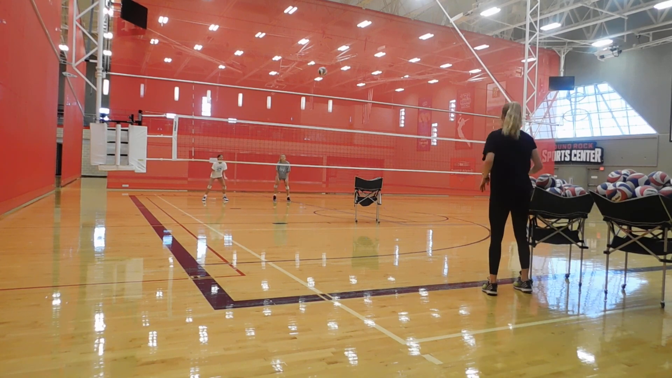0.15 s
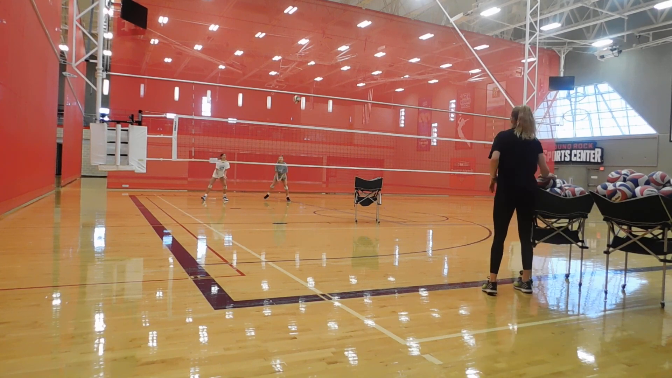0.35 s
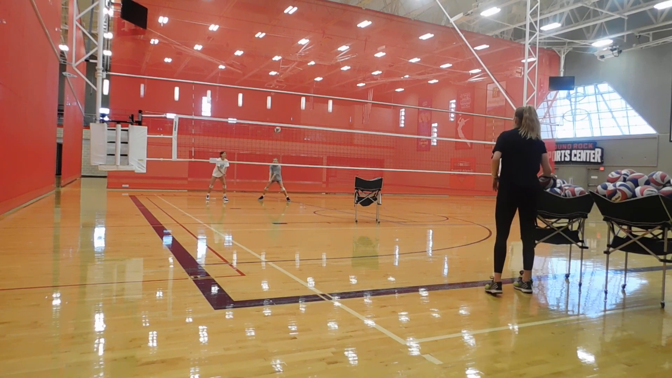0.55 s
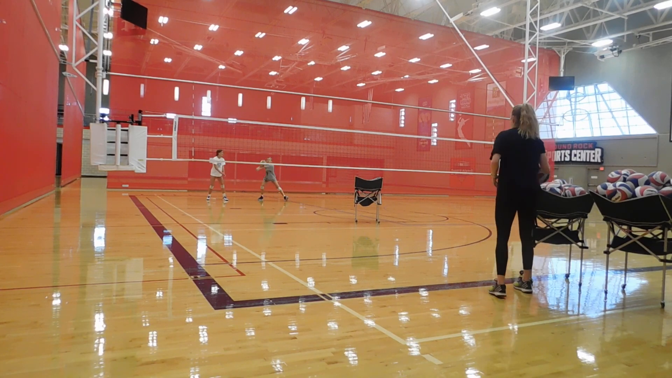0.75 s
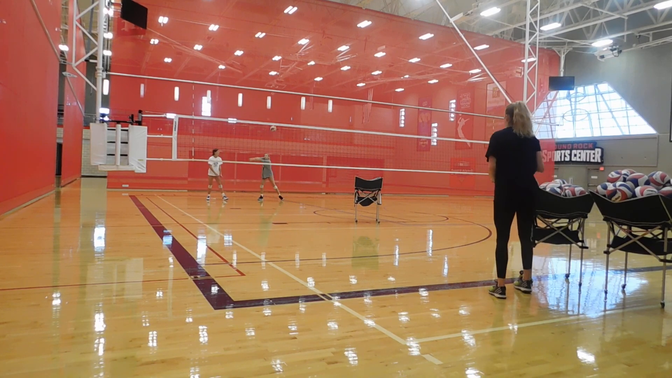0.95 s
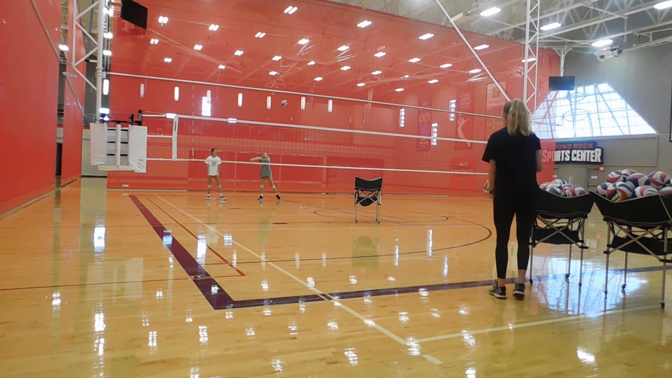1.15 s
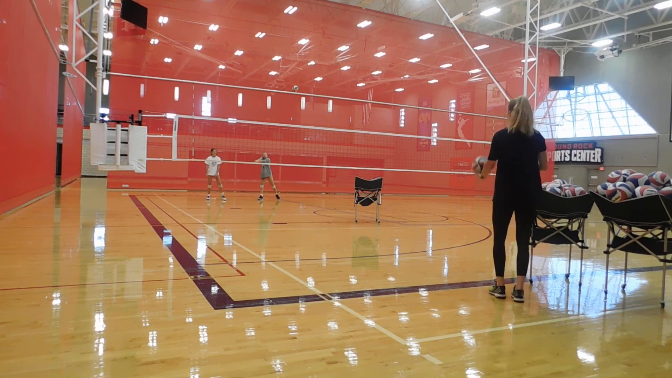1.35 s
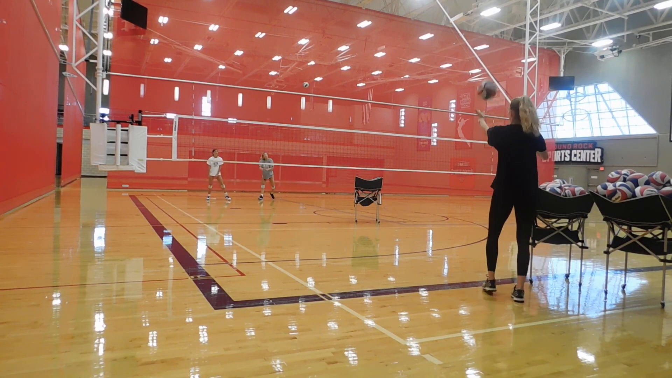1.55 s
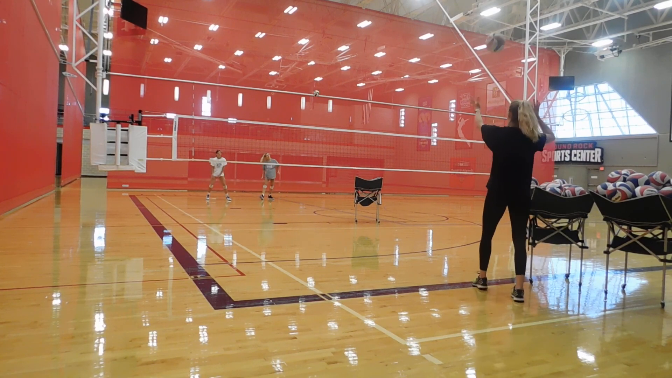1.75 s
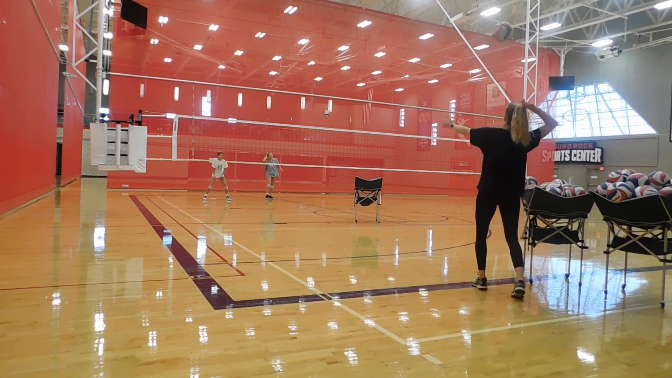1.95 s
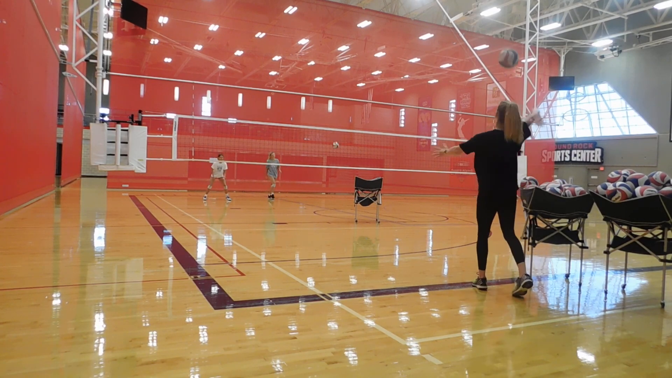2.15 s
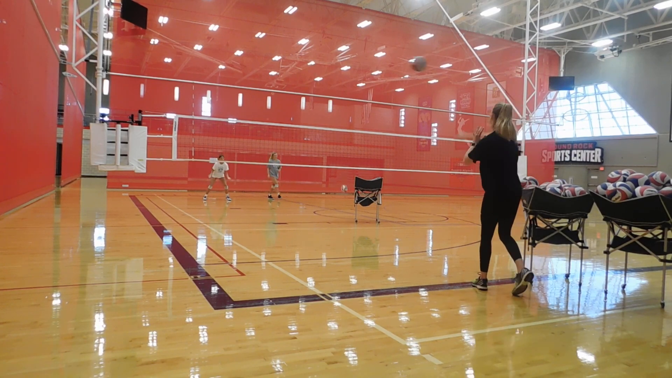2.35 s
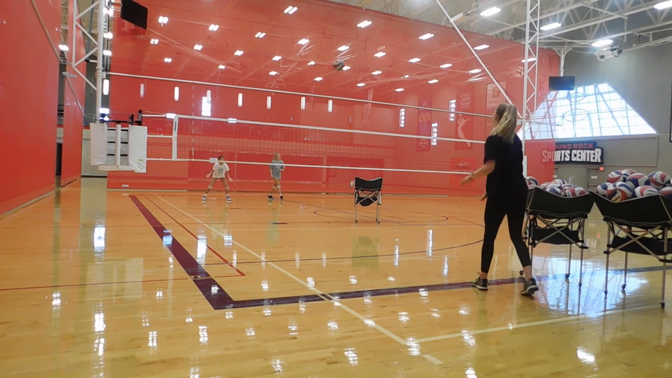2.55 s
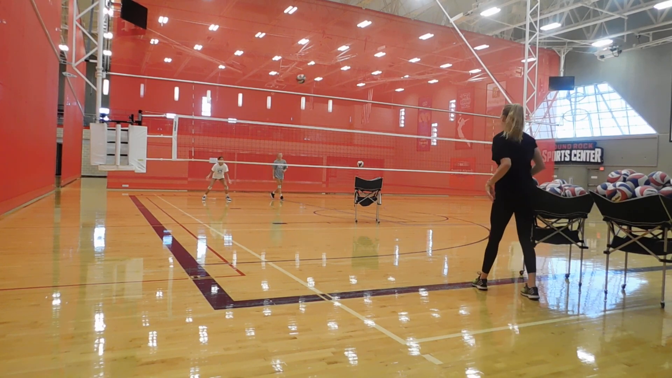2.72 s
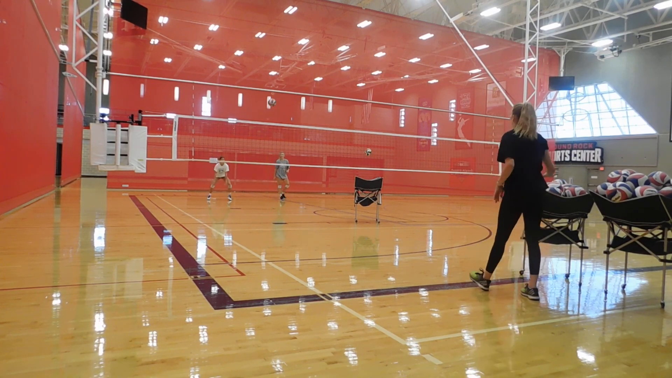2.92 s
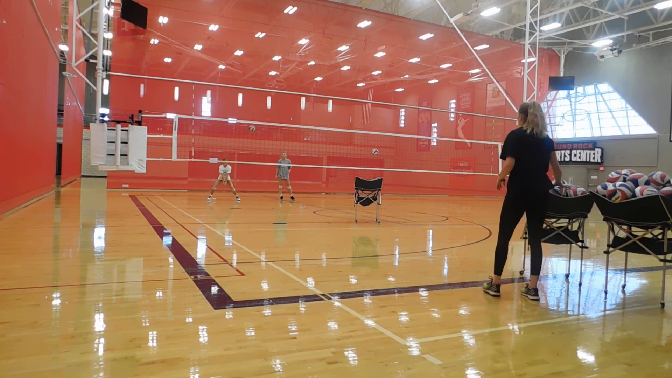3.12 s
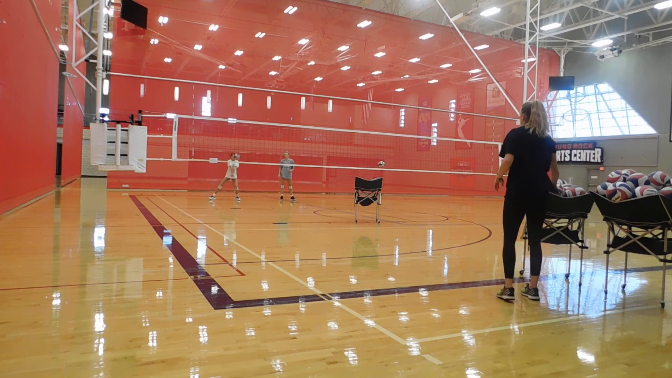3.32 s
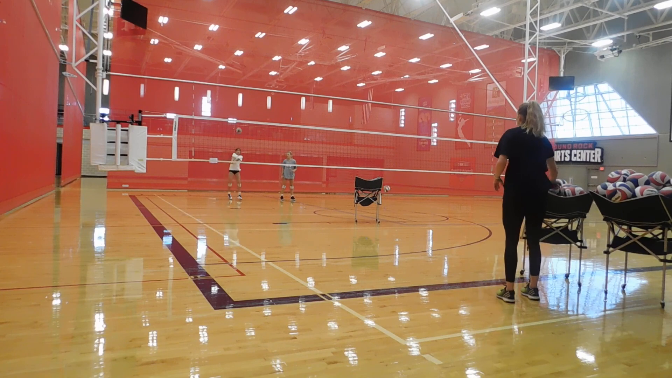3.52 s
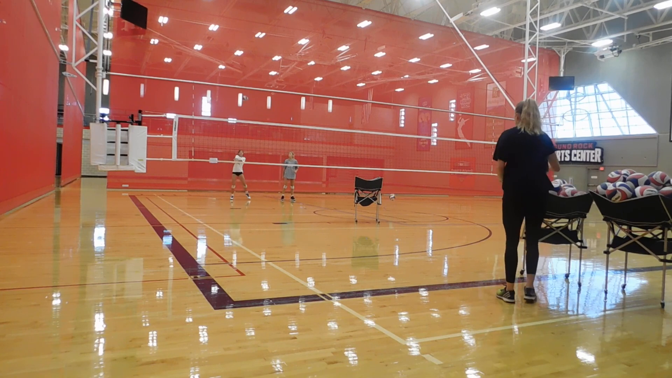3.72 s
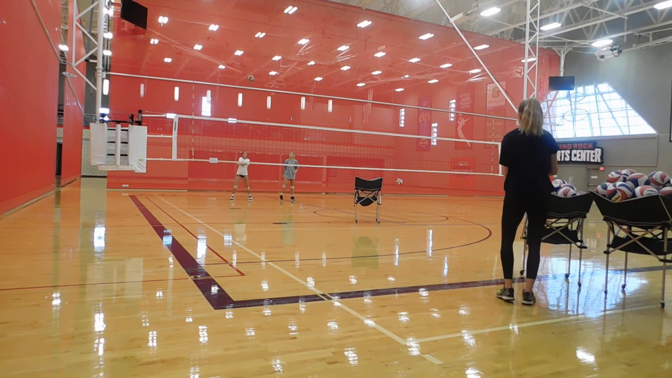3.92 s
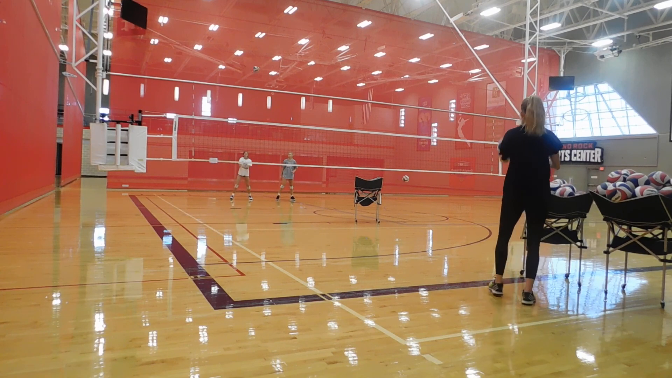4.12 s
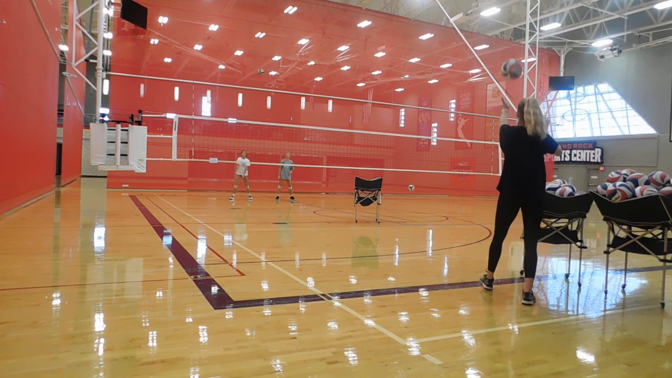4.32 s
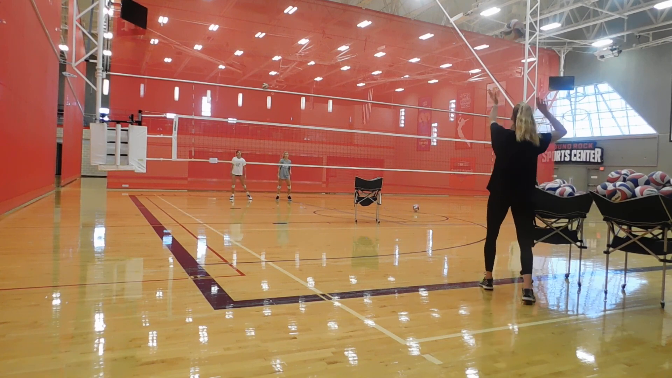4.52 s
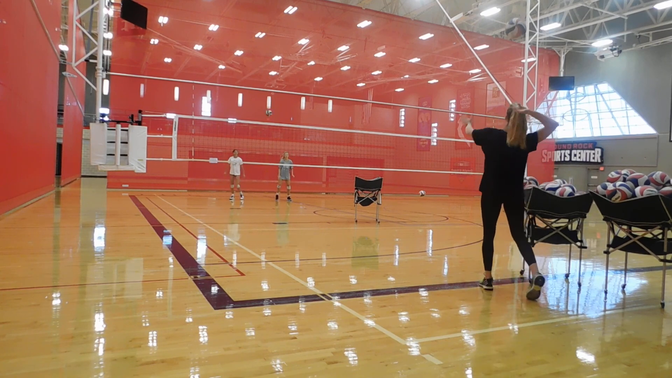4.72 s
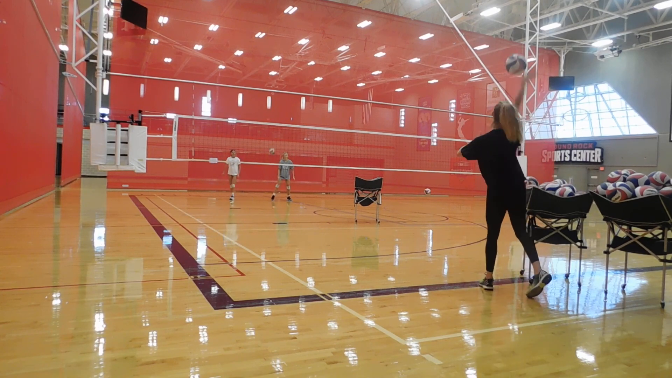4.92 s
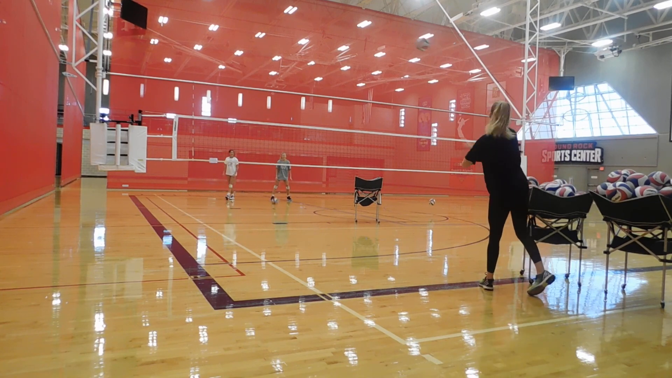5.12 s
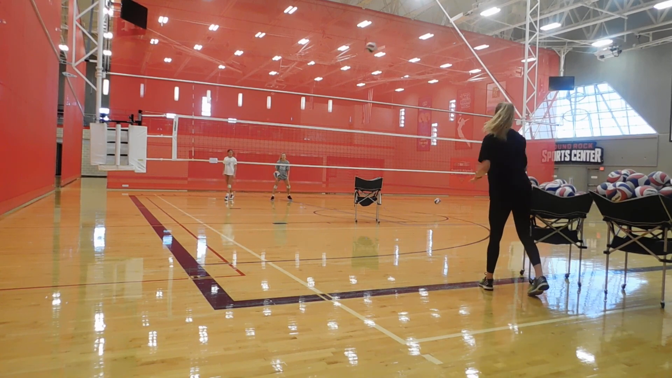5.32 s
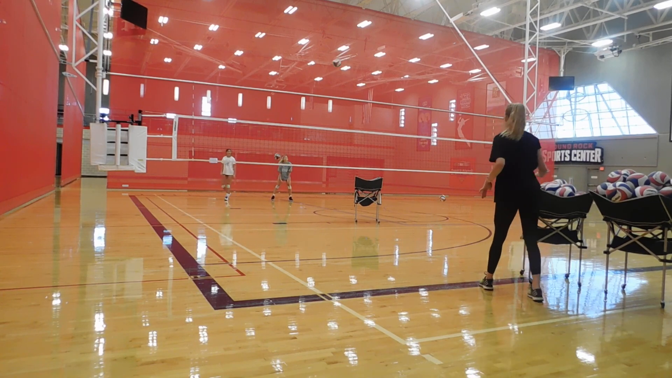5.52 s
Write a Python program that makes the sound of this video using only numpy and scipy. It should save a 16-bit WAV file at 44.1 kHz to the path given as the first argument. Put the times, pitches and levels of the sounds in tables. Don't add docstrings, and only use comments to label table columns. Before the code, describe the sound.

A large gym with a wooden floor and a steady, low ventilation rush. At the start the reverberation of an earlier bounce is dying away, with a soft scuff and a dull low shuffle around 0.3 s. At 0.85 s a ball is met with a firm, hollow smack. A quiet tap of a toss comes at 1.8 s, then a hard hand serve at 2.3 s, cracking and ringing, with a sharp bounce at 2.5 s. The echoes linger. A slap follows at 3.46 s and a duller bounce at 3.7 s. Faint scuffs and finger touches surround a soft toss near 4.6 s. The loudest serve hits at 5.0 s with a hollow ringing tone and quick roof return, followed by a very sharp bounce at 5.2 s, still reverberating at the end. The stereo microphone is near the server; the background dips briefly after loud blows.

```python
import sys
import numpy as np
from scipy import signal
from scipy.fft import rfft, irfft
from scipy.io import wavfile
from scipy.ndimage import uniform_filter1d

SR = 44100
rng = np.random.default_rng(int(sys.argv[2]) if len(sys.argv) > 2 else 0)


def dump_mix(stems):
    frames = np.atleast_2d(stems).T
    limited = np.clip(frames, -1, 1)
    pcm = np.round(limited * 32767).astype(np.int16)
    wavfile.write(sys.argv[1], SR, pcm)


def volts_from_decibels(level):
    exponent = np.asarray(level, float) / 20
    return 10 ** exponent


N = 249942
LEAD = SR // 2
EDGES = 22 * 2 ** np.arange(0, 9.8, .5)
CENTRES = np.sqrt(EDGES[1:] * EDGES[:-1])

BLOW_EVENTS = {"serve": [(2.2878, -32.5, -9, 920, 1300), (4.9937, -23.5, -12, 964, 1380)],
               "bounce": [(-.12, -34, -20, 1220, 660), (2.5066, -28, -5.5, 1420, 1980),
               (3.718, -34, -22, 1453, 858), (5.215, -22, -0.5, 1000, 700)],
               "pass": [(.8492, -28.5, -17.5, 1320, 1620)], "slap": [(3.4592, -24.5, -35, 1260, 2050)],
               "toss": [(1.8072, -50.5, -21, 1000, 2340), (4.5971, -46.5, -25.5, 1000, 1360)]}
# pitch_hz, level_db, t60_s
PUSH_MODES = [(97, -11, 0.08), (124.7, -3.5, 0.043), (175, -20, 0.076)]


def at_centres(points, column=1):
    points = np.array(points)
    return np.interp(np.log(CENTRES), np.log(points[:, 0]), points[:, column])


def add(out, start_s, sound):
    i = round(start_s * SR) + LEAD
    out[:, i:i + sound.shape[1]] += sound[:, :out.shape[1] - i]


def panned(x, pan_db):
    return x * volts_from_decibels(np.array([[pan_db / 2], [-pan_db / 2]]))


def noise_bands(size):
    # freq_hz, likeness (1 = mono)
    channel_likeness = [(30, 1), (125, 1), (250, 0.98), (500, 0.93), (1000, 0.75), (2000, 0.46),
                        (4000, -0.27), (12000, 0.015)]
    # freq_hz, left_right_db
    mic_balance = [(60, 1.5), (240, 1.5), (950, 1.5), (3770, -0.5), (15000, 1)]
    white = rng.standard_normal((2, 2, size + 4000))
    bands = []
    for k, (alike, lean_db) in enumerate(zip(at_centres(channel_likeness), at_centres(mic_balance))):
        sos = signal.butter(2, EDGES[k:k + 2], "band", fs=SR, output="sos")
        mid, side = signal.sosfilt(sos, white[k % 2])[:, 4000:]
        stereo = np.sqrt(1 + alike) * mid + np.sqrt(1 - alike) * side * [[1], [-1]]
        bands.append(panned(stereo, lean_db))
    return np.array(bands, dtype=np.float32)


def modes(table, scale, spread_db):
    t = np.arange(int(.15 * SR)) / SR
    luck = rng.standard_normal(len(table))
    return sum(volts_from_decibels(db + spread_db * z - 60 * t / t60) * np.sin(2 * np.pi * hz * scale * t)
               for (hz, db, t60), z in zip(table, luck))


def crack(edge_hz, smear_ms, rough=1):
    t = np.arange(int(.15 * SR)) / SR
    x = rough * rng.standard_normal(len(t)) * np.exp(-t / (smear_ms / 1000))
    x[0] += 1
    x = signal.sosfilt(signal.butter(1, [600, edge_hz], "band", fs=SR, output="sos"), x)
    x = signal.sosfilt(signal.butter(1, min(2 * edge_hz, 20000), fs=SR, output="sos"), x)
    return x / np.max(np.abs(x))


def in_power(parts):
    power = sum(np.abs(rfft(p, 16384)) ** 2 for p in parts)
    cepstrum = irfft(np.log(power + 1e-16) / 2)
    cepstrum[1:8192] *= 2
    cepstrum[8193:] = 0
    return irfft(np.exp(rfft(cepstrum)))[:8192]


def ventilation():
    # freq_hz, level_db (per Hz)
    rush_spectrum = [(12, -29), (20, -2), (123, -7.5), (216, -13), (330, -17), (1190, -18.5), (1910, -21),
                     (16000, -52)]
    knots = rng.standard_normal((len(CENTRES), 40))
    waver = np.array([np.interp(np.linspace(0, 39, N), np.arange(40), k) for k in knots])
    gains = volts_from_decibels(at_centres(rush_spectrum)[:, None] + 0.73 * waver)
    x = np.einsum("bct,bt->ct", noise_bands(N), gains)
    return volts_from_decibels(-45.5) * x / x.std()


def scuffs():
    # centre_s, length_s, level_db, centre_hz
    scuff_events = [(0.363, .06, -68, 9000), (0.698, .05, -70, 9000), (1.25, 0.049, -64, 9000),
                    (.05, 0.11, -50.5, 630), (0.29, 0.14, -43.5, 90), (1.96, 0.039, -50.5, 122),
                    (3.28, .09, -66.5, 9000), (3.401, 0.066, -59.5, 896), (4.499, 0.035, -59, 150),
                    (4.553, 0.0085, -62, 9000), (4.568, 0.0067, -63, 9000), (4.637, 0.006, -60, 9000),
                    (4.703, 0.006, -59, 8000), (4.624, 0.075, -62, 10000)]
    out = np.zeros((2, N + LEAD))
    t = np.arange(SR // 4) / SR
    for centre_s, length_s, level_db, centre_hz in scuff_events:
        x = rng.standard_normal((2, len(t)))
        band_hz = [centre_hz / 2, centre_hz * 1.4]
        x = signal.sosfilt(signal.butter(2, band_hz, "band", fs=SR, output="sos"), x)
        if centre_hz < 2000:
            x[1] = x[0]
        swell = np.exp(-((t - 1 / 8) / (length_s / 2)) ** 2)
        add(out, centre_s - 1 / 8, volts_from_decibels(level_db) * swell * x / x.std())
    return out


def hall():
    # freq_hz, late_t60_s, early_t60_s, early_over_late_db
    hall_decay = [(60, 2.1, 0.15, 14), (150, 3.7, 0.2, 13.5), (368, 2.14, 0.23, 4.5),
                  (1000, 2.26, 0.39, 2.5), (2520, 3.31, 0.43, 7), (5070, 1.7, 0.4, -8),
                  (9000, 1.13, 0.21, -45), (15030, 1.15, 0.2, 29)]
    # multiple of ring pitch, level_db, t60_s
    ring_afar = [(1.0, -11, 0.038), (1.03, -1.2, 0.011), (.84, -11, 0.013), (1.9, -12, 0.003)]
    # multiple of its pitch, level_db, t60_s
    second_modes = [(1.0, -7, 0.014), (1.15, -11, 0.005)]
    # pitch_hz, level_db, t60_s
    chest_modes = [(346, -10.5, 0.021), (562, -17, 0.0046)]
    hall_feed = {"serve": (-1.5, -12, 5, 2.3), "bounce": (0, -3, -2, -0.8), "pass": (2.1, -4, -1.8, -2.2),
                 "slap": (-4.5, -26, -9, -7.5), "toss": (1, 3, -9, -3), "roof": (-16.5, -28, -12.5, -11)}
    court_spots = {"serve": (4.7, 5300, 3, 0.46), "bounce": (-1.3, 3400, 1.35, 0.21),
                   "pass": (-3.5, 5500, 1.1, 0.3), "slap": (-1.4, 4800, .475, -.38),
                   "toss": (7, 3900, 4.2, .2), "roof": (2.4, 6800, 3.2, 0.3)}
    build_s, sparse_s = 0.0027, 0.16

    out = np.zeros((2, N + LEAD))
    t = np.arange(int(2.1 * SR)) / SR
    noise = noise_bands(2 * len(t))
    late = volts_from_decibels(-60 * t / at_centres(hall_decay, column=1)[:, None]).astype(np.float32)
    early = volts_from_decibels(-60 * t / at_centres(hall_decay, column=2)[:, None]).astype(np.float32)
    early *= volts_from_decibels(at_centres(hall_decay, column=3))[:, None]

    feeds = [(kind, s, db, ring_hz, second_hz)
             for kind, rows in BLOW_EVENTS.items() for s, db, _, ring_hz, second_hz in rows]
    feeds += [("roof", s + .044, db + 2.2, ring_hz, 3400) for s, db, _, ring_hz, _ in BLOW_EVENTS["serve"]]
    for kind, start_s, strength_db, ring_hz, second_hz in feeds:
        push_db, chest_db, ring_db, second_db = hall_feed[kind]
        near_db, edge_hz, bounce_ms, share = court_spots[kind]

        start = rng.integers(len(t))
        lumps = np.repeat(rng.standard_normal(len(t) // 100 + 1), 100)[:len(t)]
        decay = late + np.float32(volts_from_decibels(near_db)) * early
        path = np.einsum("bct,bt->ct", noise[:, :, start:start + len(t)], decay)
        path *= volts_from_decibels(2 * lumps * np.exp(-t / sparse_s)) * (1 - np.exp(-t / build_s))

        parts = [volts_from_decibels(push_db - 31) * modes(PUSH_MODES, 0.99, spread_db=-1),
                 volts_from_decibels(chest_db - 28) * modes(chest_modes, 1, spread_db=1)]
        parts += [volts_from_decibels(ring_db - 22) * modes([m], ring_hz, spread_db=-1) for m in ring_afar]
        parts += [volts_from_decibels(second_db - 19.5) * modes([m], second_hz, spread_db=1.5) for m in second_modes]
        snap = volts_from_decibels(-16) * crack(edge_hz, smear_ms=1, rough=0)
        parts.append(snap + share * np.roll(snap, round(bounce_ms * SR / 1000)))
        blow = volts_from_decibels(strength_db) * in_power(parts)
        add(out, start_s, signal.fftconvolve(path, blow[None], axes=1))
    return out


def echoes():
    echo_paths = {"serve": [(3.35, 14, 15400, 0.43, -23), (42.7, 11, 4900, 0.88, 5),
                  (47.4, 12.5, 8300, 2.3, -4)], "bounce": [(3.53, 8.5, 3400, 1.7, 18),
                  (39.6, -1.5, 6700, .8, .6), (51.7, -4, 7000, 0.54, 5)],
                  "pass": [(.3, 11.5, 4200, 0.68, 7), (9.9, 9, 4000, 1.8, -2.5), (43, -3, 7700, 0.95, 1.2)],
                  "slap": [(.3, 11, 2900, 2, 3.5), (9.5, -8, 2900, 2.2, -4), (22.06, -3, 2300, 1.4, 3),
                  (36.3, 2.5, 6500, 3.3, -3)], "toss": [(3.5, 6, 7400, 2.6, -22)]}
    out = np.zeros((2, N + LEAD))
    for kind, rows in BLOW_EVENTS.items():
        for start_s, strength_db, *_ in rows:
            for delay_ms, echo_db, edge_hz, smear_ms, pan_db in echo_paths.get(kind, []):
                echo = volts_from_decibels(strength_db + echo_db) * crack(edge_hz, smear_ms)
                add(out, start_s + delay_ms / 1000, panned(echo, pan_db))
    return out


def touches():
    # start_s, peak_db, dull_edge_hz, smear_ms
    touch_events = [(1.8617, -34, 2200, 1.2), (2.5342, -33, 7000, .6), (2.575, -33, 6950, 1.1),
                    (3.4566, -13, 3940, 1.8), (4.603, -34, 12000, 2.1), (5.0555, -14, 6500, 1.3),
                    (3.726, -27, 9000, 3.3), (3.776, -40, 11000, 1.3)]
    out = np.zeros((2, N + LEAD))
    for start_s, peak_db, edge_hz, smear_ms in touch_events:
        add(out, start_s, panned(volts_from_decibels(peak_db) * crack(edge_hz, smear_ms), 0))
    return out


def rings():
    # start_s, level_db, pitch_hz, t60_s
    ring_events = [(.849, -14.5, 2010, 0.017), (1.8066, -29, 2250, 0.017), (1.8613, -29, 1900, 0.0068),
                   (2.29, -15.5, 101.6, 0.19), (2.2885, -12, 410, 0.027), (2.3005, -9, 824, 0.029),
                   (2.301, -11.5, 961, 0.076), (2.3365, -20, 3400, .012), (2.507, -16, 330, .03),
                   (2.509, -14, 1870, 0.021), (3.4574, -12.5, 2270, 0.027), (3.505, -21, 1228, 0.078),
                   (4.599, -37, 1190, 0.037), (4.996, -12, 115, .15), (4.9937, -6.5, 2940, .008),
                   (4.995, 0, 382, 0.01), (4.996, -2.5, 762, 0.071), (4.998, -4, 971, 0.13),
                   (5.2175, -6, 865, 0.011), (5.256, -12, 760, .03)]
    out = np.zeros((2, N + LEAD))
    t = np.arange(int(.2 * SR)) / SR
    for start_s, level_db, hz, t60 in ring_events:
        swell = 1 - np.exp(-t / (0.038 * t60))
        ring = swell * volts_from_decibels(level_db - 60 * t / t60) * np.sin(2 * np.pi * hz * t)
        add(out, start_s, panned(ring, 0.55))
    return out


def direct_blows():
    # multiple of ring pitch, level_db, t60_s
    ball_modes = [(.42, -27, 0.034), (.79, -22, 0.015), (1.0, -26, 0.055), (1.08, -12, 0.075),
                  (1.36, -19, 0.032), (1.6, -1.5, 0.039), (2.2, 10.5, 0.0036), (3.1, -7.5, 0.004)]
    direct_levels = {"serve": (10.2, 4.3, 7.4), "bounce": (4.8, 12, 1.1), "pass": (-2.8, 7.7, 1.2),
                     "slap": (-2, .7, 1.5), "toss": (13, 11, 4)}
    out = np.zeros((2, N + LEAD))
    for kind, rows in BLOW_EVENTS.items():
        ring_db, push_db, pan_db = direct_levels[kind]
        for start_s, strength_db, crack_db, ring_hz, _ in rows:
            snap = volts_from_decibels(crack_db) * crack(edge_hz=4000, smear_ms=.5, rough=.12)
            ring = volts_from_decibels(strength_db + ring_db) * modes(ball_modes, ring_hz, spread_db=1.5)
            push = volts_from_decibels(strength_db + push_db) * modes(PUSH_MODES, 0.734, spread_db=6)
            add(out, start_s, panned(snap + ring - push, pan_db))
    return out


def scene():
    play = direct_blows() + echoes() + touches() + rings() + hall()
    play = signal.sosfilt(signal.butter(2, 62, "high", fs=SR, output="sos"), play)
    return (play + scuffs())[:, LEAD:] + ventilation()


def low_pass(x):
    return signal.sosfilt(signal.butter(12, 16650, fs=SR, output="sos"), x)


def record(dry):
    limit_db, release_db_per_s = -16, 10.5
    ramp = release_db_per_s * np.arange(N) / SR
    level_db = 10 * np.log10(uniform_filter1d(np.mean(dry ** 2, axis=0), size=200) + 1e-12)
    over_db = np.maximum.accumulate(np.maximum(level_db - limit_db, 0) + ramp) - ramp
    duck_db = signal.lfilter([.01], [1, -.99], over_db)
    x = dry * volts_from_decibels(-.6 * duck_db)
    x = signal.sosfilt(signal.cheby2(8, 40, 16800, fs=SR, output="sos"), x)
    return low_pass(np.clip(x, -1, 1))


dry = scene()
out = record(dry)
dump_mix(out)
```